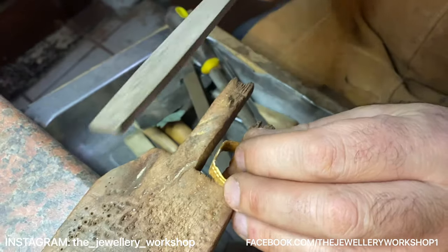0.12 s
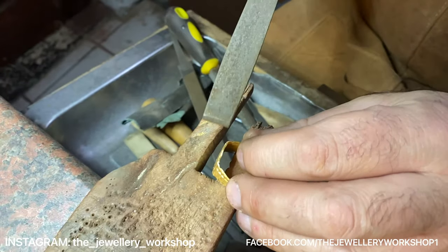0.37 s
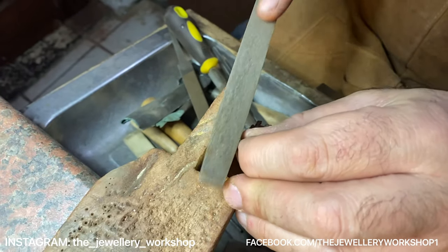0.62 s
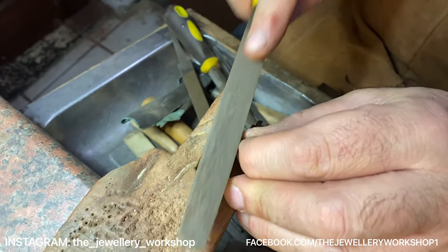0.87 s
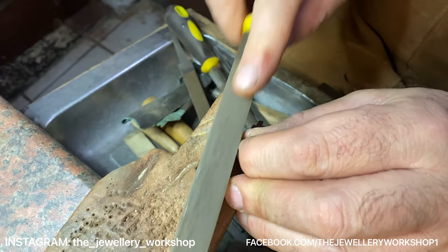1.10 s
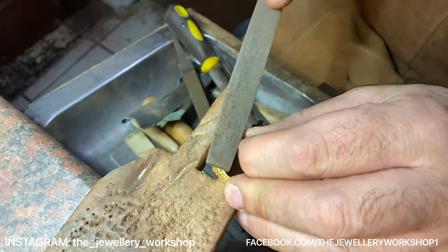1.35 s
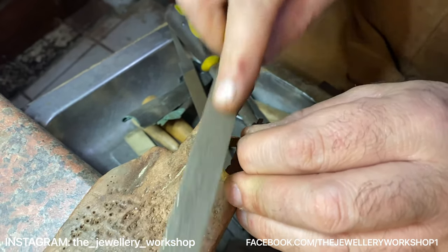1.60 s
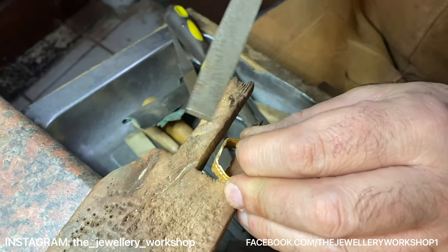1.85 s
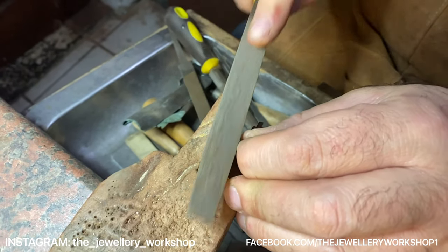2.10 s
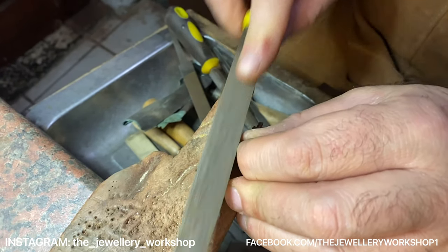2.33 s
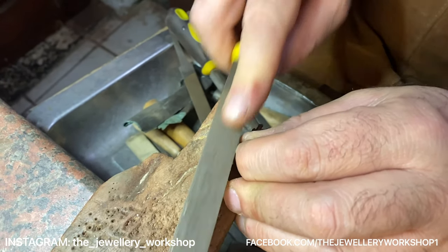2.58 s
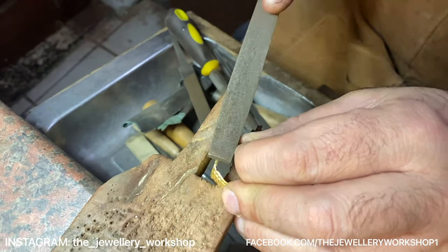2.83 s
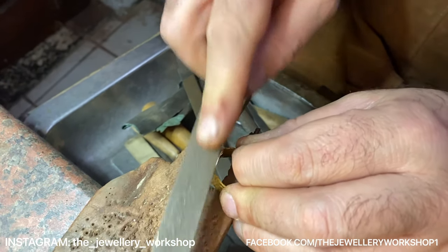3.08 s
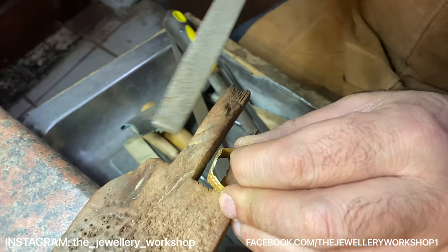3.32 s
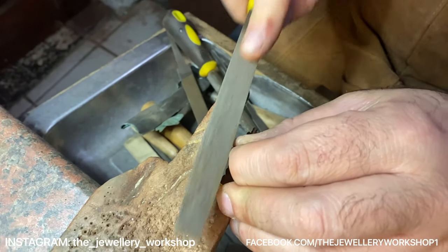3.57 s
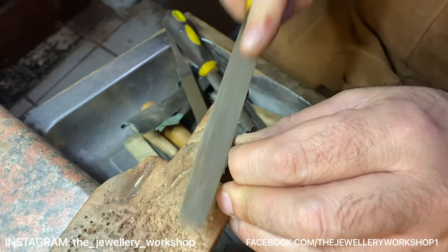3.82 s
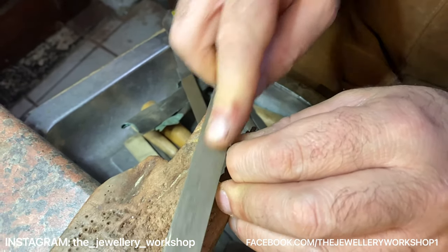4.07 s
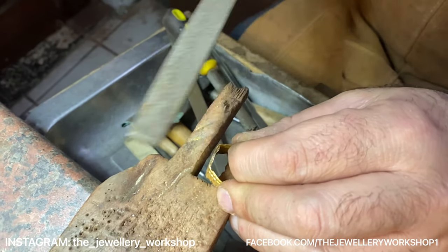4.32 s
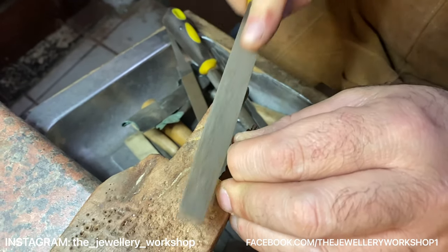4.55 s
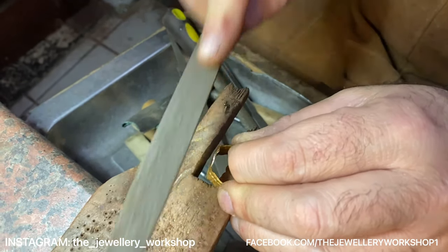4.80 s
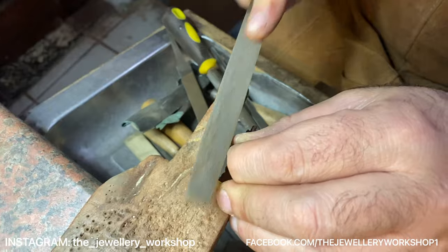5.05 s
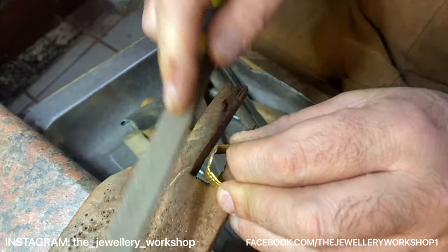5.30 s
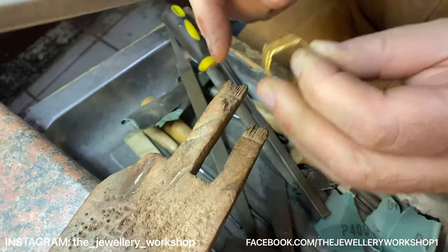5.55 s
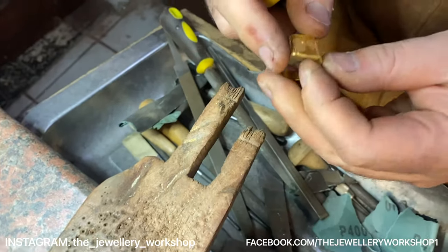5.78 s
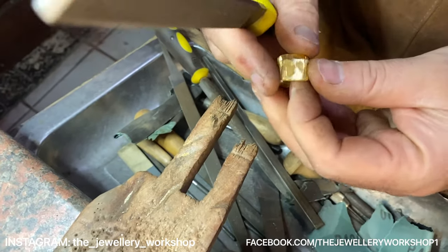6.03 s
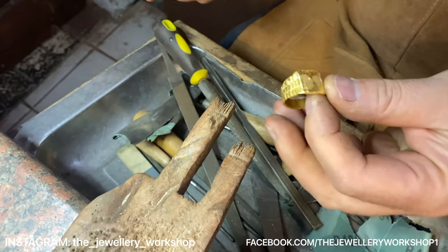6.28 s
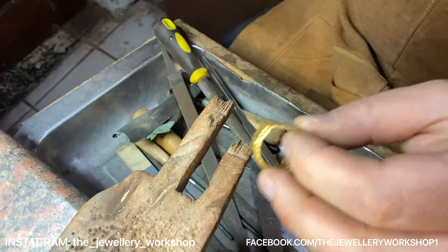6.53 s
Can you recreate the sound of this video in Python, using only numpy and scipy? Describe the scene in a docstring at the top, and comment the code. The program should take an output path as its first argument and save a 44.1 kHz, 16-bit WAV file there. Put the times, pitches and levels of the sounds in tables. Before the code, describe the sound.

A hand file scrapes a small ring in brief, gritty strokes of about a quarter second, lower-edged on pushes and brighter, slightly squeaky on some pulls. Short gaps separate the bursts, with light landing taps and tiny ticks. The final strokes are single and spaced, each begun by a clear metallic tap; a loud knock with a ping follows. Near microphone, short faint echoes, soft low room tone.

```python
"""Over cloth rustle and a low room rumble comes a dull bench knock, then a hand file is pushed and pulled over
a metal ring held on a wooden bench peg in a small quiet workshop. The teeth strike at a rate set by the speed,
grit tears between them, and resonances of file, ring and peg sound along. The file taps as it lands, filings
and tools tick, the bench knocks, and the work has faint echoes."""
import sys
import numpy as np
from scipy import signal
from scipy.io import wavfile
from scipy.ndimage import uniform_filter1d

SR = 44100
rng = np.random.default_rng(int(sys.argv[2]) if len(sys.argv) > 2 else 0)


def boost(x):
    """Linear amplitude factor 10**(x/20) for a level x in decibels (scalar or array-like)."""
    u = np.asarray(x, float) / 20
    return 10 ** u


def transcribe(signal):
    """Save signal, clipped to [-1, 1], as a 16-bit WAV file at the path in sys.argv[1]."""
    frames = np.atleast_2d(signal).T
    limited = np.clip(frames, -1, 1)
    pcm = np.round(limited * 32767).astype(np.int16)
    wavfile.write(sys.argv[1], SR, pcm)


N = 293265

# Modes of file and ring. Each row: frequency in Hz, width in Hz, relative level in dB when pushed,
# when pulled, when tapped.
STEEL_MODES = [(424, 99, -8.5, -15, -7.5), (682, 270, -6, -15, -2), (737, 110, -9.5, -10.5, -6),
               (859, 83, -5, -3.5, -0.5), (1000, 65, -4, -13.5, 1.5), (1162, 160, -2.5, -11.5, -7.5),
               (1239.5, 35, 3, -1, 12.5), (1431, 180, -10, -2, 4), (2077, 100, 0.5, 6.5, 4.5),
               (2176, 20, -4.5, 6.5, -1), (2453, 180, 11.5, 7.5, 3.5), (2580, 90, 4, 4, -17.5),
               (3055, 180, 5.5, 7.5, 12.5), (3300, 64, -6, -5, -29), (3746, 250, 1, 1.5, -8.5),
               (4310, 1200, -0.5, -1.5, -17), (4860, 410, -7.5, -0.5, -9.5), (5500, 220, -0.5, -2.5, -9),
               (6750, 260, -8.5, -5, -16.5), (9000, 22000, -21.5, -21, -23), (10030, 550, -12.5, -13, -17),
               (12600, 690, -16.5, -17.5, -30.5), (14400, 1400, -27.5, -28.5, -34.5)]
# Modes of the wooden peg. Each row: frequency in Hz, width in Hz, relative level in dB.
PEG_MODES = [(110.8, 40, -14.5), (150, 25, -11.5), (197.4, 16, 1.5), (260, 69, -7.5), (359, 79, -9),
             (411.7, 18, -4.5)]


def evened(x):
    """Scales to rms 1."""
    return x / np.sqrt(np.mean(x ** 2) + 1e-20)


def peaked(x, db):
    """Scales to a peak level."""
    return boost(db) * x / abs(x).max()


def read(points, hz):
    """Reads a spectrum on a log-frequency axis."""
    f, value = np.transpose(points)
    return np.interp(np.log(hz + 1), np.log(f + 1), value)


def drift(size):
    """Smooth chance of rms 1 that changes over about size samples."""
    noise = rng.standard_normal(N)
    return evened(uniform_filter1d(uniform_filter1d(noise, size), size))


def hiss(points, patchy_db):
    """Noise of rms 1 with a given spectrum and patches that drift in time and frequency."""
    frames, hz = N // 1024 + 5, np.fft.rfftfreq(4096, 1 / SR)
    a, b, patches = rng.standard_normal((frames, 2049, 3)).T
    patches = uniform_filter1d(patches, size=40, axis=0)
    patches = evened(uniform_filter1d(patches, size=4, axis=1))
    z = (a + 1j * b) * boost(read(points, hz)[:, None] + patchy_db * patches)
    return evened(signal.istft(z, nperseg=4096, noverlap=3072)[1][:N])


def arches(rows):
    """Speed rises from rest and falls back in each row; returns speed, travel 0-1 and the other columns over time."""
    t = np.arange(N) / SR
    current = np.maximum(np.searchsorted([r[0] for r in rows], t) - 1, 0)
    start, length, top, *rest = np.array(rows)[current].T
    travel = np.clip((t - start) / length, 0, 1)
    skew = np.log(.5) / np.log(np.clip(top, .05, .95))  # puts the top of the sine at the given share
    speed = np.sin(np.pi * travel ** skew).clip(0)
    return speed * (travel < 1), travel, *rest


def resonate(x, hz, width):
    """One resonance of gain 1 whose far skirts fall steeply."""
    narrow = signal.lfilter(*signal.iirpeak(hz, hz / width, SR), x)
    return signal.lfilter(*signal.iirpeak(hz, min(1.3, hz / width), SR), narrow)


def ring(pulse, scrape, modes, free_db=0, sharp_db=0, shift_db=0):
    """Drives modes with a shared pulse and a scrape that differs from mode to mode; noise of rms 1 keeps its power."""
    finger_hz, finger_octaves = 2300, .3  # the modes that the fingers damp
    sharp_hz, sharp_octaves = 1500, 1.81  # a sharper cut lifts modes above here, fully so this far up
    gains = []
    for k, (hz, width, db) in enumerate(modes):
        freedom = np.exp(-(np.log2(hz / finger_hz) / finger_octaves) ** 2)
        sharpness = np.clip(np.log2(hz / sharp_hz) / sharp_octaves, 0, 1)
        own_shift_db = np.roll(shift_db, k * (SR // 4))
        gains.append(boost(db + own_shift_db + free_db * freedom + sharp_db * sharpness))
    norm = np.sqrt(sum(g ** 2 * np.pi * m[1] / SR for g, m in zip(gains, modes)))
    noise = rng.standard_normal(len(pulse))
    out = np.zeros(len(pulse))
    for k, (g, (hz, width, db)) in enumerate(zip(gains, modes)):
        drive = (-1) ** k * pulse + scrape * np.roll(noise, k * 101)
        out += resonate(drive * g / norm, hz, width)
    return out


def catches(t, catch_s=0.014, hang=.4, hang_s=.015):
    """Level in dB as the file hangs briefly, dipping by a share of the jump, and the teeth suddenly catch."""
    # Each row: time in seconds, jump in dB (a negative one swaps dip and jump).
    catch_rows = [(0.781, 7.5), (0.81, 6), (0.991, 6.5), (1.163, 6.5), (1.194, 0.5), (1.227, 4), (1.367, 5),
                  (2.242, 4), (2.29, 3), (2.647, -1.5), (2.687, 4.5), (3.49, 3), (3.703, 2), (3.897, 1.5),
                  (4.501, 0), (4.984, 0.5), (5.021, 4), (5.197, 4), (5.372, 6.5)]
    total_db = 0
    for s, db in catch_rows:
        after, before = np.exp(-abs(t - s) / catch_s), -hang * np.exp(-abs(t - s) / hang_s)
        total_db = total_db + db * np.where(t >= s, after, before)
    return total_db


def strokes(rows, rule, order, notes=(), drags=()):
    """Teeth pulses that wander less the more even the cut, plus grit torn off at each tooth, drive steel and peg."""
    drag_rise_s, note_blunt = .01, 1.2
    wander, blunt, blunt_hz = .3, 0.49, 880
    grit_db, gated = 3, 0.64
    lumpy_db, rasp_db, shift_db = 1.5, 1.5, 2.18
    keen = .6  # dB of sharpness per dB of bite
    loud, thrum, sag, top_sharp_db, dull_db, free_change_db, peg_change_db, even = rule
    speed, travel, db, hz, free_db, peg_db = arches(rows)
    t = np.arange(N) / SR
    hz, even = hz * (1 - sag * (1 - speed)), even + 0 * t

    for s, length, swell_db, first_hz, last_hz, note_even, lean in notes:
        part = (t - s) / length
        held = uniform_filter1d(1. * (abs(part - .5) < .5), size=300)
        hz = hz + held * (first_hz + (last_hz - first_hz) * part - hz)
        even = even + held * (note_even - even)
        db = db + held * swell_db * np.sin(np.pi * abs(part) ** lean)
        blunt = blunt + held * note_blunt

    gain, even = boost(db) * speed ** loud, np.clip(even, 0, .99)
    for s, drag_db, fade in drags:
        rise = np.clip((t - s) / drag_rise_s, 0, 1)
        gain = np.hypot(gain, rise * boost(drag_db - fade * abs(t - s)))

    turns = np.cumsum(hz * (1 + wander * (1 - even) ** 2 * drift(size=24))) / SR
    slope = blunt + 10 * np.maximum(blunt_hz / hz - 1, 0)  # slow teeth push more softly: fewer overtones
    teeth = evened(sum(np.cos(2 * np.pi * k * turns) / k ** slope for k in range(1, 9)))
    bursts = boost(grit_db * np.minimum(rng.exponential(1, N), 4))
    grit = evened(bursts * (1 + gated * np.cos(2 * np.pi * turns)))

    catch_db = catches(t)
    lumps_db = lumpy_db * drift(size=180)  # a harder bite also cuts sharper
    rasp = rasp_db * drift(size=30)  # fast unevenness from tooth to tooth, in dB
    bite = gain * boost(lumps_db + rasp + catch_db)
    free_db = free_db + free_change_db * (travel - .5)
    sharp_db = top_sharp_db - dull_db * (1 - speed) ** 1.5 + keen * (catch_db + lumps_db)
    mode_shift_db = shift_db * drift(size=1500)  # modes are driven more or less as the contact travels
    modes = [(m[0], m[1], m[order]) for m in STEEL_MODES]
    pulse, scrape = bite * np.sqrt(even) * 0.48 * teeth, bite * np.sqrt(1 - even) * grit
    steel = ring(pulse, scrape, modes, free_db, sharp_db, mode_shift_db)
    peg_drive = speed ** thrum * boost(peg_db + peg_change_db * (travel - .5))
    return steel + ring(0 * gain, peg_drive, PEG_MODES)


def taps():
    """File landing or knocking: a push softened by contact time, a crack and a short skid ring steel and peg."""
    # Each row: time in seconds, peak in dB, peg thump in dB re peak, contact in ms,
    # frequency in Hz that the place struck favours, dry crack in dB re the ringing before softening.
    tap_rows = [(.5388, -26, -11, .04, 3020, -18), (1.969, -29, -6, 0.15, 2134, -11.5),
                (3.438, -19.5, -21, 0.072, 2370, -15.5), (4.42, -13.5, -19.5, 0.035, 3074, 1),
                (4.9106, -11.5, -21.5, 0.087, 1450, 1), (5.287, -11, -43.5, 0.053, 3224, -5)]
    bounce_s, crack_s, skid_s, skid_db = .0008, 0.0011, 0.019, -24
    favour_db, favour_width_hz = 7, 260
    out, t = np.zeros(N + SR), np.arange(SR // 5) / SR
    # an edge grazes just before the flat lands
    click = 0.17 * (t == 0) + np.roll(t == 0, round(bounce_s * SR))
    scrape = .5 * np.exp(-abs(t - bounce_s) / crack_s) + boost(skid_db) * np.exp(-t / skid_s)
    for s, db, peg_db, contact_ms, hz, crack_db in tap_rows:
        modes = [(m[0], m[1], m[4]) for m in STEEL_MODES] + [(hz, favour_width_hz, favour_db)]
        steel = ring(click, scrape, modes)
        crack = resonate(click + scrape * rng.standard_normal(len(t)), 5000, 5000)
        soft = np.exp(-2 * np.pi / SR / max(contact_ms / 1000, 1e-5))  # a longer contact dulls the blow
        blow = peaked(steel, 0) + peaked(crack, crack_db)
        blow = signal.lfilter([1], np.poly([soft, soft, soft]), blow)
        thump = ring(click, 0 * t, PEG_MODES)
        out[round(s * SR):][:len(t)] += peaked(blow, db) + peaked(thump, db + peg_db)
    return out[:N]


def ticks(decay_s=0.00296):
    """Ticks and pings of filings and tools, and the bright ping of the ring as it knocks on the bench: a short
    noise burst through one resonance."""
    # Each row: time in seconds, peak in dB, frequency in Hz, width in Hz.
    tick_rows = [(.499, -34.5, 2500, 1500), (5.372, -41.5, 1550, 150), (1.655, -57, 6980, 9000),
                 (3.155, -62.5, 9000, 9000), (3.205, -64.5, 9000, 9000), (4.102, -49.5, 8020, 9000),
                 (4.13, -59, 7000, 6000), (5.286, -22, 3300, 50), (5.407, -50, 5000, 6000),
                 (5.613, -66, 2580, 30)]
    out, t = np.zeros(N + SR), np.arange(SR // 5) / SR
    for s, db, hz, width in tick_rows:
        burst = np.exp(-t / decay_s) * rng.standard_normal(len(t))
        out[round(s * SR):][:len(t)] += peaked(resonate(burst, hz, width), db)
    return out[:N]


def knocks(rattle=0.17):
    """A rounded push with some rattle rings the bench; broader high modes die first, so the knock seems to fall."""
    # Each row: time in seconds, peak in dB, peg thump in dB re peak, brightness in dB per octave, rise in ms.
    knock_rows = [(.266, -41, -30, -2, 2.3), (.5022, -22, -19.5, 8, 1.2), (5.2875, -14, -40, -4, 1.5)]
    # Wood and tray. Each row: frequency in Hz, width in Hz, relative level in dB.
    bench_modes = [(530, 90, -4.5), (765, 150, 3), (1284, 210, -5), (1623, 200, -3.5), (2030, 335, -3)]
    out, t = np.zeros(N + SR), np.arange(SR // 5) / SR
    click = 1. * (t == 0)
    for s, db, peg_db, bright_db, rise_ms in knock_rows:
        rise = t * 1000 / max(rise_ms, .1)
        modes = [(hz, width, mode_db + bright_db * np.log2(hz / 1000)) for hz, width, mode_db in bench_modes]
        body = ring(click, rattle * rise * np.exp(-rise), modes) * np.minimum(rise, 1)
        thump = ring(click, 0 * t, PEG_MODES)
        out[round(s * SR):][:len(t)] += peaked(body, db) + peaked(thump, db + peg_db)
    return out[:N]


def rustle(power=1.07):
    """Cloth noise that swells and fades with each movement, and a low swell as the ring is turned in the hands."""
    # Hands and sleeve between strokes. Each row: start in seconds, length in seconds,
    # share of the length at the top, level in dB.
    rustle_rows = [(-.06, .32, 0.57, -65), (1.6, .36, 0.61, -68.5), (3.08, 0.39, .55, -75.5)]
    # Turning the ring; columns as above.
    shuffle_rows = [(5.6, .8, 0.55, -70.5)]
    # Cloth spectrum. Each row: frequency in Hz, relative level in dB per Hz.
    cloth_spectrum = [(240, -41), (400, -12), (612, 0), (979, -9.5), (1940, -2), (2250, -8), (2870, -7.5),
                      (3610, -12), (15000, -36)]
    # Low swell spectrum; columns as above.
    dull_spectrum = [(60, -12), (110, 0), (250, -4), (400, -20), (800, -50)]
    speed, _, db = arches(rustle_rows)
    low_speed, _, low_db = arches(shuffle_rows)
    cloth = boost(db) * speed ** power * hiss(cloth_spectrum, patchy_db=2.5)
    return cloth + boost(low_db) * low_speed * hiss(dull_spectrum, patchy_db=2.5)


def room(x):
    """Sparse echoes of random sign, each band dying at its own speed."""
    # Each row: frequency in Hz, time to fall 60 dB in seconds.
    decay_times = [(150, 0.21), (700, 0.3), (1500, .28), (4000, 0.15), (10000, 0.36)]
    echoes = np.zeros(SR // 2)
    at = np.arange(200, SR // 2 - 20, 20)
    echoes[at + rng.integers(0, 20, len(at))] = rng.choice([-1., 1.], len(at))
    hz, t, z = signal.stft(echoes, SR, nperseg=256)
    fade = boost(-60 * t / read(decay_times, hz)[:, None])
    tail = signal.istft(z * fade, SR, nperseg=256)[1]
    return signal.fftconvolve(x, tail / np.linalg.norm(tail))[:N]


def air(level_db=-69.5):
    """Room hiss and rumble, with a few wavering tones of noise through narrow resonances."""
    # Each row: frequency in Hz, relative level in dB per Hz.
    air_spectrum = [(18, -27), (30, -7), (111, -6), (467, -19), (606, -19), (852, -20.5), (1360, -21.5),
                    (1470, -26.5), (1770, -23), (15500, -41)]
    # Each row: frequency in Hz, width in Hz, rms level in dB.
    hum_rows = [(46.3, 10, -67.5), (103, 11, -76), (198, 12, -79.5), (620, 40, -82), (1390, 50, -89.5)]
    noise = rng.standard_normal(N)
    out = boost(level_db) * hiss(air_spectrum, patchy_db=.4)
    for hz, width, db in hum_rows:
        out += boost(db) * evened(resonate(resonate(noise, hz, width), hz, width))
    return out


def scene():
    """File work and its echoes over the rustle and room air."""
    # Each row a stroke: start in seconds, length in seconds, share of the length at top speed, pressure in dB,
    # teeth passing in Hz at top speed, freedom of the ring in the fingers in dB, peg thrum in dB.
    push_rows = [(.535, 0.24, 0.49, -29.5, 1087, -3, -38.5), (.95, 0.21, 0.46, -29.5, 1100, -5.5, -44.5),
                 (1.33, 0.22, .4, -26.5, 1053, -9, -44), (1.96, 0.28, 0.54, -24, 1109, 0, -43.5),
                 (2.41, .22, 0.49, -26, 1110, -0.5, -47.5), (2.82, 0.24, 0.42, -28, 1132, -7, -48.5),
                 (3.435, .255, .55, -27, 1035, 1, -46), (3.87, .23, 0.44, -27.5, 1180, -3.5, -46.5),
                 (4.425, 0.29, 0.52, -27, 1092, -4, -43), (4.945, 0.28, 0.51, -25.5, 1125, -4.5, -41)]
    # Columns as above.
    pull_rows = [(.77, 0.18, 0.54, -27, 1200, -4, -46.5), (1.14, 0.2, .55, -24, 1280, -4.5, -48),
                 (2.22, .2, 0.53, -22.5, 1360, 0, -50), (2.62, .21, .45, -24, 1310, -3, -52.5),
                 (3.68, 0.21, 0.46, -22.5, 1360, -2, -48)]
    # How hand speed (0-1) and travel shape a stroke: loudness power, peg power, share of the tooth rate lost
    # at rest, sharpness in dB at top speed, its loss at rest in dB, change of ring freedom over the stroke in dB,
    # change of peg thrum over the stroke in dB, evenness 0-1.
    push_rule = (1.6, 0.84, 0.28, -15, 10, -2.5, 3.5, 0.3572)
    # Columns as above.
    pull_rule = (1.62, 0.2, 0.5, -15, 9, 1.5, -2.5, 0.33)
    # Parts of pulls where the teeth are heard as a note, locked to the file's bending or slowing to a halt.
    # Each row: start in seconds, length in seconds, swell in dB, first Hz, last Hz, evenness 0-1,
    # lean of the swell (under 1 early).
    note_rows = [(.848, .052, 8, 882.4, 866.2, 0.6, 1.05), (1.27, .066, 5.5, 1014, 418.4, .55, .45)]
    # Light drags as the file settles after landing or lifts away.
    # Each row: time in seconds, level in dB, fade in dB per second.
    drag_rows = [(.545, -41, 199.5), (1.52, -45.5, 247), (1.975, -36.5, 198), (3.03, -46.5, 248.5),
                 (3.445, -37.5, 150.5), (4.06, -41, 245.5), (4.43, -42.5, 201), (4.69, -48.5, 257.5),
                 (4.92, -44, 302), (5.2, -49, 299.5), (5.3, -37.5, 250)]
    filing = strokes(push_rows, push_rule, order=2, drags=drag_rows)
    filing += strokes(pull_rows, pull_rule, order=3, notes=note_rows)
    work = filing + taps() + ticks() + knocks()
    echo_db = -11.5
    return (work + boost(echo_db) * room(work) + rustle() + air())[None]


def band_limit(x):
    """A steep low-pass at the top of the band."""
    return signal.sosfilt(signal.butter(12, 16770, fs=SR, output="sos"), x)


def record(dry):
    """Limits the finished mix with a steep low-pass at the top of the band."""
    return band_limit(dry)


dry = scene()
out = record(dry)
transcribe(out)
```